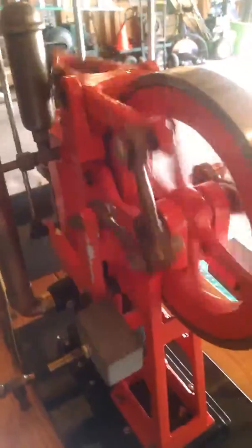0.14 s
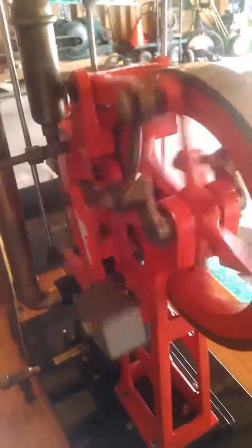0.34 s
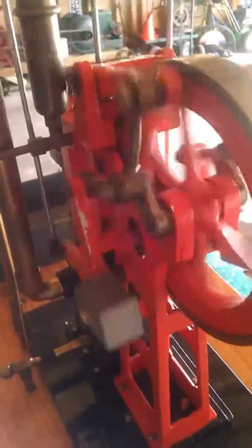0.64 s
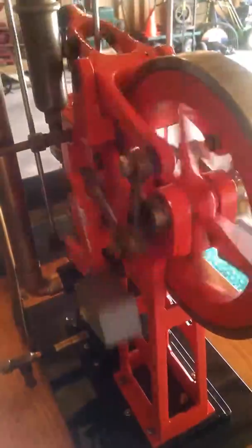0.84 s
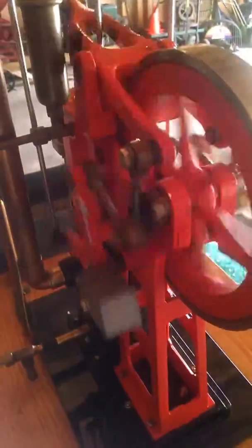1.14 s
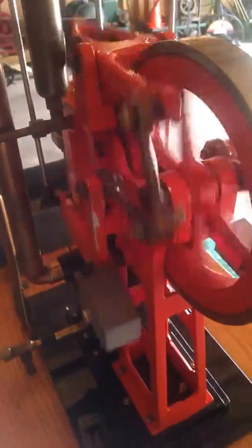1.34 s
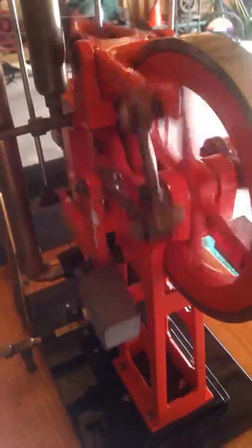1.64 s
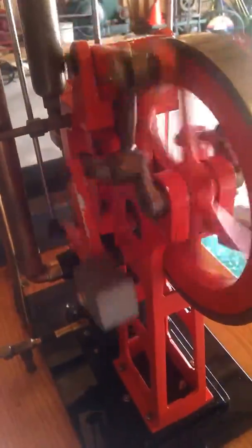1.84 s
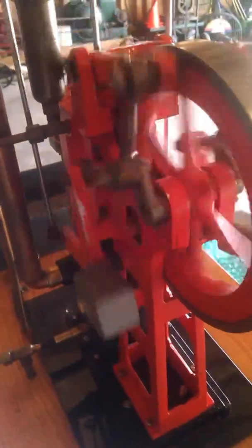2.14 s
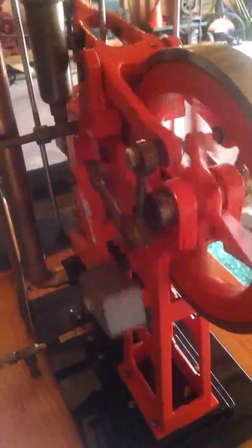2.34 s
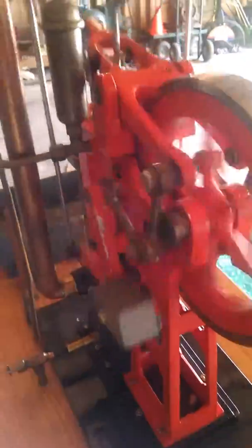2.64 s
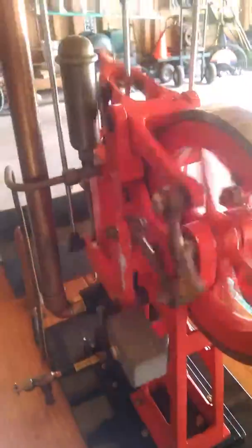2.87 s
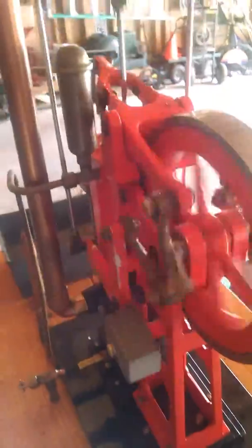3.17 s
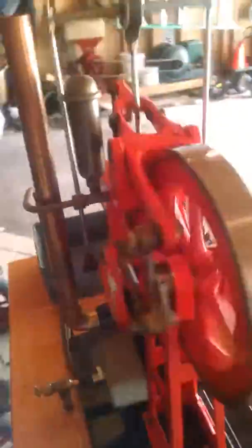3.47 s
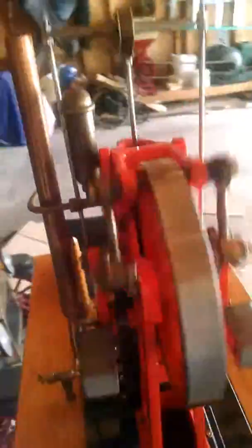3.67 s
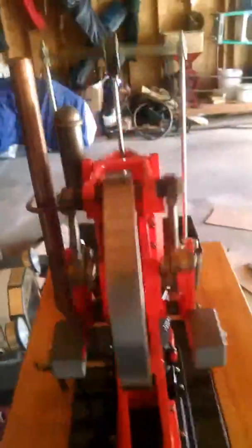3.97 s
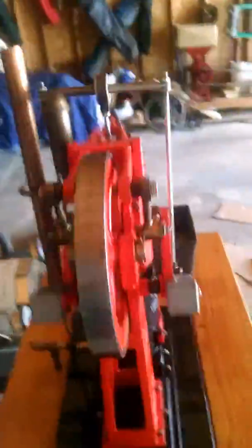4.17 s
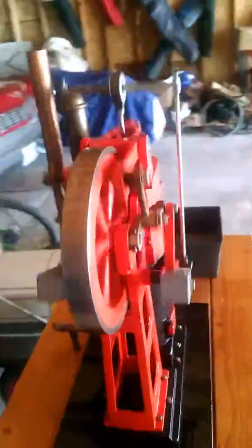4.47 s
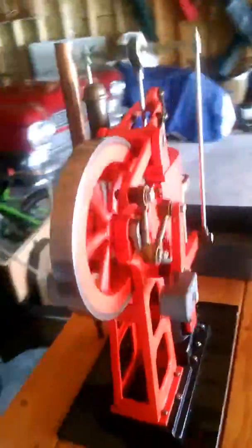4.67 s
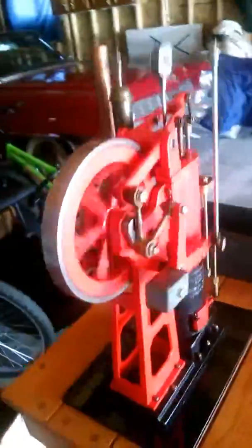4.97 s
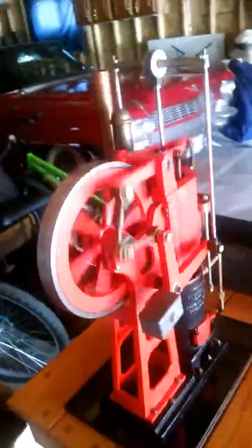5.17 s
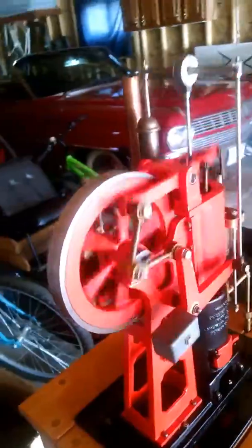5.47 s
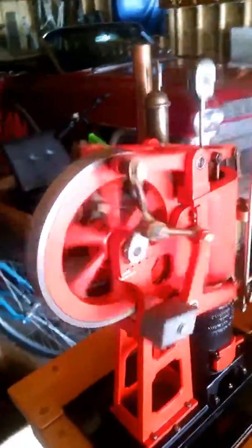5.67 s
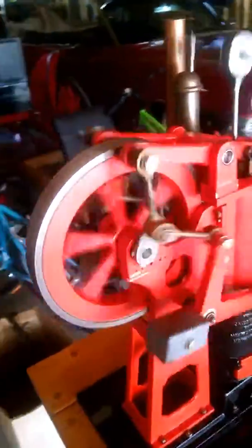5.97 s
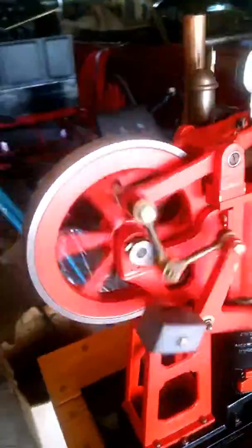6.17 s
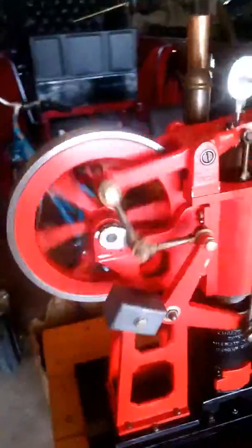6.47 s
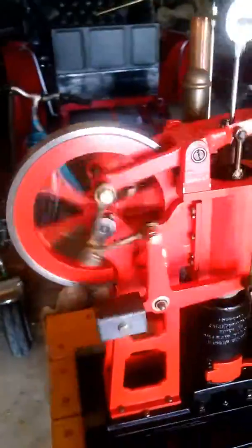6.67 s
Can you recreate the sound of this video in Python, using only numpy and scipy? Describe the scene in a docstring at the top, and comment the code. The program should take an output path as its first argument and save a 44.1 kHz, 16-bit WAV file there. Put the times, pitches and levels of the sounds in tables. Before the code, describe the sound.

A small model hot air engine runs throughout on a wooden bench, heard close up in a garage with a short echo. It turns a little over three times a second and gains speed very slightly. Every turn has one metallic knock, a run of light ticks from rods and pivots, and a hollow low chug that booms through the base and bench. Sharper snaps and small clinks stand out around 1.6 to 1.7 seconds and again near the end. A faint low hum sits underneath, fading by about 5 seconds. From around 3 seconds the microphone is carried round the engine, shifting the tone a little, with soft foot scuffs near 3.6 and 4 seconds and again from 6.2 to 6.8. Dry bearings give faint, thin, high squeals around 3.8 to 4.2 seconds and 6 to 6.4 seconds.

```python
"""Model hot air engine

A model hot air engine runs on a wooden bench in a garage, a little over three turns a second and slowly
gaining speed. In each turn the slack in the linkage knocks once, rods and pivots tick in a fixed order,
and the piston strokes make the base boom; each impact excites the damped modes of the parts it strikes.
Dry bearings squeal faintly. The microphones are carried round with a few scuffs, over a low hum."""
import sys
import numpy as np
from scipy import signal
from scipy.fft import rfft, irfft, next_fast_len
from scipy.io import wavfile
from scipy.ndimage import map_coordinates

SR = 44100
rng = np.random.default_rng(int(sys.argv[2]) if len(sys.argv) > 2 else 0)


def wav_record(signal):
    """Record a signal, one row per channel, as 16-bit PCM in the file named by sys.argv[1]."""
    frames = np.transpose(np.atleast_2d(signal))
    bounded = np.clip(frames, -1, 1)
    # unit amplitude maps onto the largest positive 16-bit level
    quanta = np.round(bounded * 32767).astype(np.int16)
    wavfile.write(sys.argv[1], SR, quanta)


N = 300482
TIME = np.arange(N) / SR

# Levels in the tables are relative: each source applies its own gains and filters.
# spectra of room air, handling rumble, scuffs and steady noise: frequency_hz, gain_db
AIR_SPECTRUM = [(25, -6), (200, -10.5), (285, 5.5), (400, -10), (900, -1.5), (1400, -15), (2400, -21),
                (3700, -21), (4600, -22.5), (6000, -25), (10400, -46), (16000, -60)]
RUMBLE_SPECTRUM = [(15, -25), (35, 5), (60, 3.5), (110, -3), (170, -3.5), (300, -9), (1000, -38)]
SCUFF_SPECTRUM = [(300, -1), (1200, -1), (2000, -0.5), (2550, -15.5), (3200, 0.5), (4000, 5), (4700, -0.5),
                  (6000, 2.5), (7500, -5.5), (12000, -5), (16000, -14)]
NOISE_SPECTRUM = [(30, 17), (80, 33), (400, 22.5), (2500, -20), (6000, 10), (15000, 9)]
# spectra of the near and the wall reflections: frequency_hz, gain_db
SCATTER_SPECTRUM = [(1000, -7.5), (2500, -32), (4000, 0.5), (8000, -1.5), (15000, -0.5)]
WALL_SPECTRUM = [(280, -14), (500, 3.5), (1500, -3.5), (2200, -2.5), (2600, -16), (3300, -6),
                 (15000, -10.5)]
# response of both microphones, left-over-right tilt, far-over-crank-side tilt: frequency_hz, gain_db
MIC_RESPONSE = [(200, -1), (290, 0.5), (450, -2.5), (1500, -0.5), (2000, 7), (2700, 7.5), (3300, 1.5),
                (4000, 1), (4700, 3), (5800, 0), (7000, 4.5), (8600, 1.5), (12000, 0)]
STEREO_TILT = [(30, -3), (80, -4.5), (130, -3), (290, -3.1), (700, 1), (1300, -1), (2800, -0.3),
               (4400, 1.5), (6000, 2), (7500, 5), (10000, 5.5), (14500, 9)]
FAR_SIDE_TILT = [(130, -16), (200, -1.5), (285, -1.5), (400, 14.5), (550, -7), (850, 5), (1200, -1),
                 (1600, -9.5), (2500, -10), (4000, -8), (7000, -8.5), (15000, -5)]
# band edges where stereo widening flips left and right between like and opposite phase: frequency_hz
PHASE_FLIPS = [1730, 2950, 4170, 5450, 6720, 8050, 10000, 11330, 12620, 13900]
# path round the engine: time_s, side (0 crank, 1 far), links_db, base_db
MIC_PATH = [(0, 0.37, -5.5, 4.5), (1.5, 0.71, -3, 0.5), (2.8, 0.7, -3.5, 1.5), (3.6, 0.79, -0.5, 1.5),
            (4.5, 1, -2, 1.5), (5.5, 0.88, -3.5, -1.5), (6.8, 0.9, -3.5, 2.5)]
# course of the hum: time_s, pitch_hz, level_db
HUM_CURVE = [(0.0, 83.3, -66), (0.22, 79.4, -46), (1.05, 80.3, -50.5), (4.03, 86.26, -52), (5.3, 86.7, -61)]
# squeals, one curve each: time_s, pitch_hz, level_db
SQUEAL_CURVES = [
    [(3.73, 8450, -66), (3.78, 8900, -54), (3.86, 9300, -55), (3.95, 9050, -59)],
    [(5.92, 8950, -60), (6.0, 9300, -58), (6.1, 9550, -58), (6.18, 9100, -58), (6.27, 8600, -50),
     (6.31, 8450, -55), (6.35, 8900, -58), (6.39, 8350, -54), (6.46, 8300, -65)],
]
# scuffs of walking and swells of sliding hiss: peak_s, rise_s, decay_s, level_db
FOOT_SCUFFS = [(2.95, 0.018, 0.056, -51), (3.65, 0.021, 0.046, -41), (3.975, 0.015, 0.084, -39),
               (4.28, 0.11, 0.076, -51), (4.87, 0.043, 0.066, -49.5), (5.74, 0.034, 0.036, -46.5),
               (6.24, 0.014, 0.067, -46.5), (6.57, 0.043, 0.17, -39), (6.72, 0.018, 0.1, -38.5),
               (6.80, 0.038, 0.069, -40)]
SLIDE_SWELLS = [(3.05, 0.073, 0.24, -53.5), (4.85, 0.24, 0.43, -56), (5.12, .08, 0.3, -55)]
# whistles of a dry pivot: peak_s, rise_s, decay_s, level_db, pitch_hz
WHISTLES = [(4.15, 0.084, 0.17, -56, 6640), (6.05, 0.083, 0.2, -54, 5900),
            (6.378, 0.0013, 0.0024, -38, 6030)]
# modes of bench top, base plate, rods, pivots, side links and crank: frequency_hz, width_hz, level_db
BENCH_MODES = [(119, 43, -11.5), (197, 42, -8.5), (245.4, 33, -1), (267.4, 34.6, 1), (385.3, 6.7, -15.5)]
BASE_MODES = [(368, 22, -13.5), (455.7, 35, 4), (566, 29.5, 4.5), (666, 33, 2), (694, 67, -1),
              (796, 49, -6), (873, 21.7, -1.5), (1067, 67, -5.5), (1191, 50, -3), (1332, 91, -5.5),
              (1478, 82, -7.5), (1560, 12.6, -3), (1895, 940, -16.5)]
ROD_MODES = [(2320, 300, -0.5), (3067, 263, 8), (3028, 234, 6), (3407, 316, 10), (3670, 565, 8),
             (4050, 46, 5), (4700, 130, -20), (5880, 870, -3), (6620, 630, -1), (7280, 560, -1.5),
             (8530, 1130, 2), (8330, 990, 3), (9400, 2700, -14)]
PIVOT_MODES = [(9200, 530, -4), (12100, 18000, 19), (14360, 240, 36.5), (14500, 1500, 0)]
LINK_MODES = [(2080, 310, 1), (3260, 210, -1.5), (3520, 320, 6), (3800, 330, 7), (4720, 180, 3.5),
              (5750, 224, 6.5), (5770, 950, -0.5), (7570, 420, -2), (8620, 220, -4.5)]
CRANK_MODES = [(570, 60, 1), (735, 100, 6), (860, 110, 5.5), (1160, 150, 2), (1320, 150, 3), (1480, 150, 3)]
# clinks of loose parts: peak_s, pitch_hz, level_db
PART_CLINKS = [(1.212, 9800, -34), (1.732, 8430, -28), (2.761, 3480, -39.5), (2.953, 3020, -38),
               (2.980, 3570, -38), (3.749, 5980, -40), (3.886, 3780, -39), (5.348, 3810, -38)]
# ticks of loose pivots and metallic snaps of the linkage: start_s, level_db
PIVOT_TICKS = [(0.069, -32.5), (0.2382, -29), (0.2821, -42), (0.309, -36), (0.3292, -37), (0.386, -33),
               (0.5837, -40), (0.702, -28), (0.74, -41), (0.8865, -41), (0.9382, -35), (0.993, -31),
               (1.1389, -30), (1.1808, -40), (1.1959, -37), (1.2095, -41), (1.2353, -28), (1.2747, -42),
               (1.6001, -29.5), (1.896, -32.5), (1.918, -40), (1.933, -38), (2.09, -39), (2.1144, -38),
               (2.175, -34), (2.3348, -31), (2.4974, -30.5), (2.5348, -34.5), (2.728, -33), (2.7933, -33),
               (2.829, -37), (2.9322, -31), (2.9517, -31), (2.9736, -42), (3.0828, -36), (3.2691, -41),
               (3.3784, -38), (3.4008, -34), (4.2025, -36.5), (4.7015, -34), (4.851, -32.5), (4.888, -36.2),
               (5.1522, -31.5), (5.192, -36), (5.4424, -30.5), (5.4821, -33.5), (5.7295, -34), (5.769, -39),
               (5.9795, -36), (6.0083, -32.5), (6.032, -42), (6.1932, -39), (6.228, -30), (6.248, -37.8),
               (6.2961, -30), (6.5784, -37)]
LINK_SNAPS = [(0.6357, -20.5), (0.7294, -22.5), (0.7823, -21.5), (0.936, -21), (1.2101, -20.5),
              (1.2617, -24.5), (1.5698, -16), (1.7318, -14), (1.9192, -21.5), (1.9687, -25), (2.2596, -25),
              (2.9512, -27), (3.156, -26), (3.651, -20), (4.0366, -31), (4.4962, -19.5), (6.083, -29),
              (6.582, -24), (6.768, -30), (6.773, -18), (6.7827, -14)]
# light contacts of every turn: turn_fraction, rise_s, decay_s, base_db, links_db, tick_db
TURN_CONTACTS = [(.17, .002, .003, -60, -57, -49.5), (0.251, 0.0009, 0.02, -40, -39.5, -50),
                 (0.282, 0.0023, 0.0022, -36.5, -70, -62), (.335, 0.00047, 0.002, -28, -36, -45),
                 (0.38, 0.0045, 0.022, -42.5, -65, -76), (0.424, 0.00069, .002, -50, -42.5, -61),
                 (0.459, 0.0035, 0.0065, -67, -43.5, -49.5), (0.563, 0.0081, 0.0013, -47, -46, -73),
                 (.618, 0.00022, 0.00036, -38, -38, -38), (0.655, 0.0088, 0.009, -36.5, -44, -75),
                 (0.775, 0.0084, 0.032, -44, -41.5, -49), (0.802, 0.00026, 0.00078, -63, -36, -47),
                 (0.937, .002, 0.0017, -70, -44, -52)]
# swells of the base on return strokes: peak_s, level_db
RETURN_SWELLS = [(0.981, -37), (1.282, -46), (1.571, -28.5), (1.611, -34), (2.17, -30), (2.445, -28.5),
                 (2.72, -29.5), (3.016, -28.5), (3.05, -35.5), (3.31, -33), (3.346, -31), (3.646, -28),
                 (3.924, -28.5), (4.25, -30.5), (4.511, -31.5), (4.835, -29), (5.119, -33.5), (5.955, -31),
                 (5.985, -32.5), (6.25, -31.5), (6.518, -48), (6.55, -30), (6.694, -31)]
# shudder of the bench: turn_fraction, rise_s, decay_s, crank_side_db, far_side_db
# (the negative rise makes it set in abruptly, 0.44 s later, on a return stroke)
BENCH_SHUDDER = (1.1, -0.11, 0.61, -22.5, -43.5)
# thud of the bench after a knock: delay_s, pitch_hz, level_db
BENCH_THUD = (0.0049, 182, -38.5)
# thud that opens a stroke: ahead_s, pitch_hz, relative_to_lead_in_db
STROKE_THUD = (0.051, 175, -6)
# working strokes: peak_s, level_db, pitch_hz, lead_in_ahead_s, lead_in_db
POWER_STROKES = [(0.176, -29, 305, .026, -22), (0.478, -20, 288, .027, -21.5),
                 (0.778, -23, 288, .026, -23.5), (1.081, -20.9, 285, .029, -23),
                 (1.38, -23.3, 283, .035, -28), (1.678, -21.5, 285, .028, -30),
                 (1.976, -23.6, 277, .041, -27), (2.274, -23.6, 283, .028, -35),
                 (2.576, -22.1, 283, .032, -25), (2.868, -20.3, 291, .038, -30),
                 (3.162, -22.0, 277, .037, -26), (3.46, -21.1, 285, .03, -24),
                 (3.758, -20.3, 277, .03, -26.5), (4.049, -21.1, 277, .027, -29),
                 (4.341, -22.6, 283, .04, -28), (4.636, -21.6, 280, .035, -28),
                 (4.926, -25.6, 272, .037, -29), (5.219, -21.9, 285, .035, -32),
                 (5.516, -22.7, 280, .036, -33), (5.805, -21.4, 280, .036, -33),
                 (6.092, -24.2, 285, .038, -30), (6.377, -23.1, 275, .036, -33),
                 (6.665, -24.3, 280, .04, -27)]
# knock that starts each turn: start_s, clank_db, clack_db, low_hz, high_hz, boom_db, boom_hz
TURN_KNOCKS = [(0.2351, -26.5, -31.5, 970, 1446, -27.5, 289), (0.535, -21.5, -29.5, 745, 1478, -31, 307),
               (0.8336, -21.5, -31.5, 760, 1154, -31, 308), (1.1346, -25, -30.5, 666, 1460, -32, 280),
               (1.4364, -20, -31.5, 790, 1124, -32.5, 285), (1.733, -20.5, -32.5, 735, 1208, -33, 308),
               (2.0314, -25, -30, 646, 1177, -27.8, 287), (2.3294, -23, -31.5, 930, 1210, -28, 300),
               (2.628, -22, -27, 882, 1180, -27, 302), (2.9243, -24, -33, 700, 1140, -30, 292),
               (3.2196, -23, -32, 950, 1345, -20.5, 286), (3.5151, -24.5, -29.5, 770, 1170, -27, 280),
               (3.8101, -25.5, -29, 786, 1160, -24, 282), (4.1054, -26, -29, 833, 1183, -23, 279),
               (4.3996, -24, -30.5, 985, 1170, -23, 285), (4.6919, -27, -30.5, 853, 1270, -23, 280),
               (4.9838, -27, -30.5, 890, 1210, -24, 273), (5.2777, -25.5, -31, 740, 1257, -22, 274),
               (5.5684, -24, -28.5, 948, 1308, -24, 272), (5.857, -21.5, -29.5, 650, 1233, -21.5, 277),
               (6.146, -22.5, -29, 910, 1286, -26.0, 284), (6.4334, -22.5, -30.5, 716, 1306, -27, 279),
               (6.722, -22.5, -30, 625, 1310, -16, 277.4)]
# the two crank tones relative to clack_db: low_db, high_db
CRANK_TONE_GAINS = (0.5, 1.2)


def from_db(db):
    """Amplitude grows tenfold for every 20 dB."""
    return 10 ** (np.asarray(db) / 20)


def rms_one(x):
    """Normalisation to unit mean power."""
    return x / np.sqrt(np.mean(x ** 2) + 1e-20)


def curve_at(rows, times=TIME):
    """Linear interpolation of each column of a curve."""
    s, *columns = np.transpose(rows)
    return [np.interp(times, s, column) for column in columns]


def coloured(x, spectrum, depth=1):
    """Zero-phase filtering by a spectrum whose decibels are scaled by depth."""
    size = next_fast_len(x.shape[-1] + SR // 10)
    hz, db = np.transpose(spectrum)
    log_hz = np.log(np.fft.rfftfreq(size, 1 / SR) + 1)
    gain = from_db(depth * np.interp(log_hz, np.log(hz), db))
    return irfft(rfft(x, size) * gain, size)[..., :x.shape[-1]]


def drift(rate_hz):
    """Low-passed noise gives a smooth fluctuation of unit rms."""
    pole = np.exp(-80 * np.pi * rate_hz / SR)
    noise = rng.standard_normal(N // 40 + 2002)
    slow = signal.lfilter([1], [1, -2 * pole, pole * pole], noise)[2000:]
    return np.interp(np.arange(N) / 40, np.arange(len(slow)), rms_one(slow))


def bursts(rows):
    """Incoherent bursts (peak_s, rise_s, decay_s, level_db) add in power to one envelope."""
    power = np.zeros(N)
    for s, rise, decay, db in rows:
        a, b = np.searchsorted(TIME, [s - 4 * rise, s + 7 * decay])
        t = TIME[a:b] - s
        envelope = np.exp(np.where(t < 0, -.5 * (t / rise) ** 2, -t / decay))
        power[a:b] += (from_db(db) * envelope) ** 2
    return np.sqrt(power)


def grit(per_s, spread_db):
    """Shot noise of unit rms: tiny random collisions of uneven size."""
    sizes = rng.choice([-1, 1], N) * from_db(spread_db * np.clip(rng.standard_normal(N), -2, 2))
    return rms_one(sizes * (rng.random(N) < per_s / SR))


def taps(times, levels_db):
    """Each clean blow is an impulse of force."""
    force = np.zeros(N)
    at = (np.asarray(times) * SR).astype(int)
    inside = (at >= 0) & (at < N)
    force[at[inside]] = from_db(levels_db)[inside]
    return force


def rattle(rows, steady_db, hit_db, per_s, spread_db):
    """Contact force over steady friction: the more abrupt a contact, the more of it is one impulse."""
    s, rise, _, db = np.transpose(rows)
    chatter = grit(per_s, spread_db) * np.hypot(bursts(rows), from_db(steady_db))
    softness_db = 20 * np.log10(np.maximum(rise, .001) / .0009)
    return chatter + taps(s, db + hit_db - softness_db)


def ring(force, modes):
    """Modal superposition: force is convolved with a unit-energy sum of damped cosines."""
    t = TIME[:SR // 5]
    response = sum((-1) ** k * from_db(db) * width * np.exp(-np.pi * width * t)
                   * np.cos(2 * np.pi * hz * t) for k, (hz, width, db) in enumerate(modes))
    return signal.fftconvolve(force, response / np.linalg.norm(response))[:N]


def resonant_noise(modes):
    """Resonances select narrow bands from white noise."""
    return ring(rng.standard_normal(N), modes)


def tone_pulses(rows, glide_hz_per_s=0):
    """One mode swells and decays for each row (peak_s, pitch_hz, rise_s, fall_s, level_db)."""
    out = np.zeros(N)
    for (s, hz, rise, fall, db), phase in zip(rows, rng.uniform(0, 2 * np.pi, len(rows))):
        a, b = np.searchsorted(TIME, [s - 4 * rise, s + 7 * fall])
        t = TIME[a:b] - s
        envelope = np.where(t < 0, np.exp(-.5 * (t / rise) ** 2), 1 / np.cosh(t / fall))
        cycles = (hz + .5 * glide_hz_per_s * t) * t
        out[a:b] += from_db(db) * envelope * np.sin(2 * np.pi * cycles + phase)
    return out


def each_turn(fraction, jitter_s):
    """Rotation repeats an event at nearly the same fraction of every turn."""
    knocks = np.array(TURN_KNOCKS)[:, 0]
    starts = np.r_[2 * knocks[0] - knocks[1], knocks, 2 * knocks[-1] - knocks[-2]]
    return starts[:-1] + fraction * np.diff(starts) + jitter_s * rng.standard_normal(len(starts) - 1)


def by_side(times, crank_db, far_db, vary_db):
    """Directivity: an event's level follows the listening side, with random scatter."""
    side = curve_at(MIC_PATH, times)[0]
    return crank_db + (far_db - crank_db) * side + vary_db * rng.standard_normal(len(times))


def walk_round(x):
    """Directivity varies with frequency, so each side of the engine has its own timbre."""
    far = np.clip(curve_at(MIC_PATH)[0], 0, 1)
    return (1 - far) * coloured(x, FAR_SIDE_TILT, -0.38) + far * coloured(x, FAR_SIDE_TILT, 0.79)


def stereo_widening(x, bass_hz=151, sway_s=1.8e-5):
    """The recorder's widening puts left and right in antiphase in deep bass and every second band."""
    size = next_fast_len(N + SR // 10)
    hz = np.fft.rfftfreq(size, 1 / SR)
    def step(edge_hz, width_hz):
        return .5 + .5 * np.tanh((hz - edge_hz) / width_hz)
    half_cycles = 1 - step(bass_hz, 200) + sum(step(flip_hz, 283) for flip_hz in PHASE_FLIPS)
    right = irfft(rfft(x, size) * np.exp(-1j * np.pi * half_cycles), size)[:N]
    swayed = np.arange(N) - SR * sway_s * drift(5.1)  # hand sway varies the right channel's lag
    return np.array([x, map_coordinates(right, [swayed], order=5, mode="nearest")])


def steady_noise(spectrum, db, shape=N):
    """Stationary noise takes its colour from a spectral envelope."""
    return from_db(db) * rms_one(coloured(rng.standard_normal(shape), spectrum))


def hum(gain_db=5.0):
    """A low pure tone, its phase the integral of frequency, climbs a little and fades."""
    hz, db = curve_at(HUM_CURVE)
    return np.sqrt(2) * from_db(db + gain_db) * np.sin(2 * np.pi * np.cumsum(hz) / SR)


def garage(x, scatter_db=-5.0, walls_db=-6.0):
    """Reverberation: treble scatters at once off wheel and bench, and the walls add a longer tail."""
    t = TIME[:SR // 2]
    def reflections(spectrum, t60_s, first_s):
        tail = rng.standard_normal((2, len(t))) * from_db(-60 * t / t60_s) * (t > first_s)
        return coloured(tail / np.linalg.norm(tail[0]), spectrum)
    near = from_db(scatter_db) * reflections(SCATTER_SPECTRUM, t60_s=.036, first_s=.00048)
    walls = from_db(walls_db) * reflections(WALL_SPECTRUM, t60_s=.31, first_s=.0039)
    return signal.fftconvolve(x[None], near + walls, axes=1)[:, :N]


def walking(uneven_db=2.5, scuff_db=-1.0, step_s=3.44, step_db=-35):
    """Gritty scuffs arrive directly and by scattering, unlike at each ear; one footfall thuds softly."""
    level = bursts(FOOT_SCUFFS) * from_db(scuff_db + uneven_db * drift(19))
    direct, *scattered = [level * rms_one(coloured(grit(per_s=13000, spread_db=7), SCUFF_SPECTRUM))
                          for _ in range(3)]
    footfall = bursts([(step_s, .04, .05, step_db)]) * resonant_noise([(87.4, 13, 7), (210, 70, -1)])
    return stereo_widening(direct + footfall) + np.array(scattered)


def sliding():
    """Sliding friction makes a high band of noise that swells and fades."""
    return bursts(SLIDE_SWELLS) * resonant_noise([(8700, 1200, 0)])


def bearing_squeal(chirp_db=-48.5):
    """Stick-slip friction makes dry bearings whistle hoarsely; one chirps once a turn."""
    waver_hz = 55 * drift(40) + 95 * drift(300)
    flicker = from_db(3 * drift(50))
    squeals = np.zeros(N)
    for curve in SQUEAL_CURVES:
        hz, db = curve_at(curve)
        sounding = (TIME > curve[0][0]) & (TIME < curve[-1][0])
        squeals += sounding * from_db(db) * np.sin(2 * np.pi * np.cumsum(hz + waver_hz) / SR)
    chirps = bursts([(s, .005, .005, chirp_db) for s in each_turn(0.79, jitter_s=.0034)])
    chirps *= resonant_noise([(5850, 61, 0)])
    whistles = sum(bursts([burst]) * resonant_noise([(hz, 180, 0)]) for *burst, hz in WHISTLES)
    return squeals * flicker + chirps + whistles


def clinks():
    """Loose small parts vibrate briefly, each in a single mode."""
    return tone_pulses([(s, hz, .0008, .004, db) for s, hz, db in PART_CLINKS])


def steel_ping(pitch_hz=9655):
    """A steel part rings freely a quarter turn after the knock, radiating mostly to the crank side."""
    times = each_turn(0.249, jitter_s=.00034)
    levels = by_side(times, crank_db=-35, far_db=-62, vary_db=2)
    return tone_pulses([(s, pitch_hz, .001, .012, db) for s, db in zip(times, levels)])


def pivot_ticks(blow_db=15.0, chatter_db=0.5, to_links_db=-13):
    """An impulse and a moment of chatter excite the pivots; coupling passes a little to the links."""
    times, levels = np.transpose(PIVOT_TICKS)
    envelope = bursts([(s, .0002, .001, db + chatter_db) for s, db in PIVOT_TICKS])
    force = taps(times, levels + blow_db) + grit(per_s=13000, spread_db=2) * envelope
    return ring(force, PIVOT_MODES) + from_db(to_links_db) * ring(force, LINK_MODES)


def linkage(vary_db=1.5, snap_db=11.0, links_db=3.0, tick_db=10.5):
    """Backlash: pivots take up their play in the same order each turn, over steady bearing friction."""
    base, links, ticks = [], [], []
    for fraction, rise, decay, *levels in TURN_CONTACTS:
        times = each_turn(fraction, jitter_s=.0014)
        scatter_db = rng.normal(0, vary_db, (len(times), 3)) * [.5, 1, 1]
        for s, (base_level, link_level, tick_level) in zip(times, levels + scatter_db):
            base.append((s, rise, decay, base_level))
            # the lighter the part, the shorter its contact
            links.append((s, .7 * rise, .7 * decay, link_level + links_db))
            ticks.append((s, min(rise, .001), min(decay, .002), tick_level + tick_db))
    snaps = taps(*np.transpose(LINK_SNAPS))
    base_force = rattle(base, steady_db=-47.5, hit_db=12.5, per_s=1800, spread_db=2.5)
    link_force = rattle(links, steady_db=-73, hit_db=10.5, per_s=4200, spread_db=3.5)
    pivot_force = rattle(ticks, steady_db=-80, hit_db=8, per_s=6300, spread_db=23)
    low = ring(base_force, BASE_MODES)
    middle = ring(link_force + from_db(snap_db) * snaps, LINK_MODES)
    high = ring(pivot_force + snaps, PIVOT_MODES)
    _, path_links_db, path_base_db = curve_at(MIC_PATH)
    return low * from_db(path_base_db) + (middle + high) * from_db(path_links_db)


def base_boom(delay_s=0.01814, boom_db=-1.1, swell_hz=283):
    """Resonance: the base on the bench thuds and booms after each knock and swells on return strokes."""
    late_s, thud_hz, thud_db = BENCH_THUD
    booms = tone_pulses([(s + delay_s, hz, .008, .016, db + boom_db) for s, *_, db, hz in TURN_KNOCKS])
    thuds = tone_pulses([(s + late_s, thud_hz, .004, .007, thud_db) for s, *_ in TURN_KNOCKS])
    swells = tone_pulses([(s, swell_hz, .017, .017, db) for s, db in RETURN_SWELLS], glide_hz_per_s=700)
    return booms + thuds + swells


def bench_shudder(steady_db=-45.0):
    """Forced vibration: the bench shakes steadily and shudders roughly on the return strokes."""
    fraction, rise, decay, crank_db, far_db = BENCH_SHUDDER
    times = each_turn(fraction, jitter_s=.002)
    levels = by_side(times, crank_db, far_db, vary_db=0.5)
    shudder = bursts([(s, rise, decay, db) for s, db in zip(times, levels)])
    return np.hypot(shudder, from_db(steady_db)) * resonant_noise(BENCH_MODES)


def piston_strokes(lead_in_hz=264.3, glide_hz_per_s=1200, gain_db=-1.0, flutter_db=1.0):
    """Each stroke drives the base in three transients of rising pitch: thud, lead-in and full push."""
    early_s, thud_hz, thud_db = STROKE_THUD
    thuds, lead_ins, pushes = [], [], []
    for s, db, hz, ahead_s, lead_db in POWER_STROKES:
        thuds.append((s - early_s, thud_hz, .006, .006, lead_db + thud_db))
        lead_ins.append((s - ahead_s, lead_in_hz, .0065, .006, lead_db))
        pushes.append((s, hz, .007, .0135, db))
    chugs = tone_pulses(thuds + lead_ins, glide_hz_per_s) + tone_pulses(pushes)
    return chugs * from_db(gain_db + flutter_db * drift(74))


def knock(rods_db=-5.0, pivots_db=-14, crank_db=21.0, bounce_s=0.0084):
    """Impact with rebound: the slack joint closes, the crank rings, and rods, base and pivots chatter."""
    times, clank_db, clack_db, low_hz, high_hz, _, _ = np.transpose(TURN_KNOCKS)
    rebounds_s = bounce_s * (1 + 0.05 * rng.standard_normal(len(times)))
    tones = tone_pulses([(s + .002, hz, .001, .0078, db + tone_db)
                         for s, db, *pitches in zip(times, clack_db, low_hz, high_hz)
                         for hz, tone_db in zip(pitches, CRANK_TONE_GAINS)])
    clacks = taps(times, clack_db + crank_db) + taps(times + rebounds_s, clack_db + crank_db - 1)
    chatter = grit(per_s=14000, spread_db=3)
    def blows(levels, decay_s, delay_s=0):
        # a light touch, the full blow, the rebound
        return chatter * bursts([(s + delay_s + offset_s, .0018, decay_s, db + offset_db)
                                 for s, db, rebound_s in zip(times, levels, rebounds_s)
                                 for offset_s, offset_db in ((-.003, -8.5), (0, 0), (rebound_s, -7))])
    base = ring(blows(clack_db, decay_s=.018), BASE_MODES)
    rods = ring(blows(clank_db + rods_db, decay_s=.0051), ROD_MODES)
    pivots = ring(blows(clank_db + pivots_db, decay_s=.0051, delay_s=.0017), PIVOT_MODES)
    return tones + ring(clacks, CRANK_MODES) + base + rods + pivots


def scene():
    """Superposition of engine, room and handling in the two channels."""
    engine = knock() + piston_strokes() + pivot_ticks()
    engine += walk_round(linkage() + base_boom() + bench_shudder())
    engine += steel_ping() + clinks() + bearing_squeal() + sliding()
    air = steady_noise(AIR_SPECTRUM, db=-42)
    rumble = steady_noise(RUMBLE_SPECTRUM, db=-47.5)
    noise_floor = steady_noise(NOISE_SPECTRUM, db=-50.5, shape=(2, N))
    return stereo_widening(engine + air + rumble + hum()) + walking() + garage(engine) + noise_floor


def record(dry, cutoff_hz=15700):
    """Frequency response: the left microphone is brighter, the right fuller; a low-pass cuts the top."""
    pair = np.array([coloured(dry[0], STEREO_TILT, 0.1), coloured(dry[1], STEREO_TILT, -1.0)])
    low_pass = signal.ellip(10, .2, 80, cutoff_hz, fs=SR, output="sos")
    return signal.sosfilt(low_pass, coloured(pair, MIC_RESPONSE))


dry = scene()
out = record(dry)
wav_record(out)
```